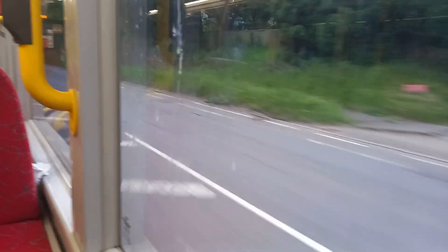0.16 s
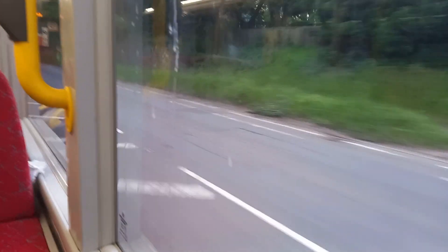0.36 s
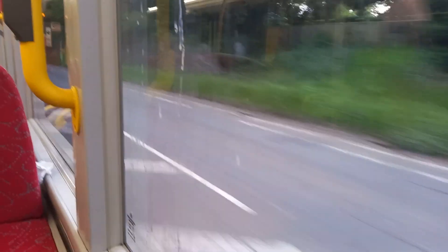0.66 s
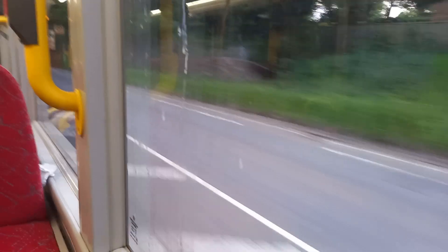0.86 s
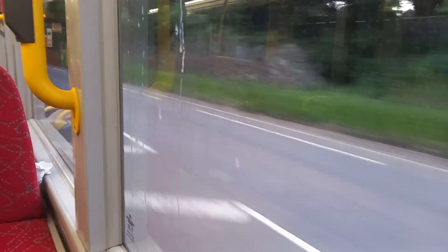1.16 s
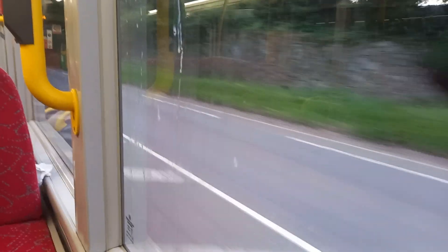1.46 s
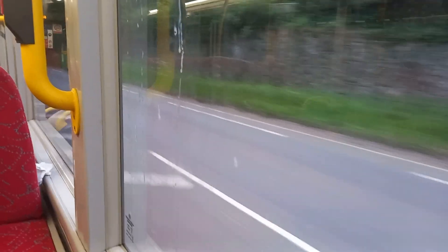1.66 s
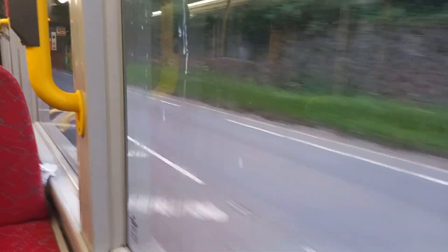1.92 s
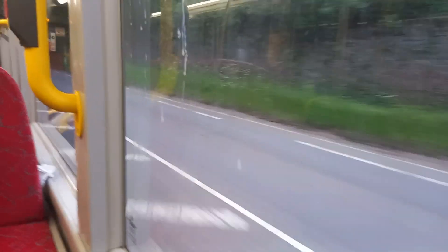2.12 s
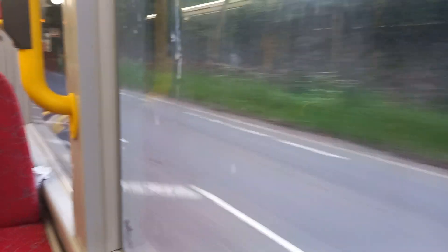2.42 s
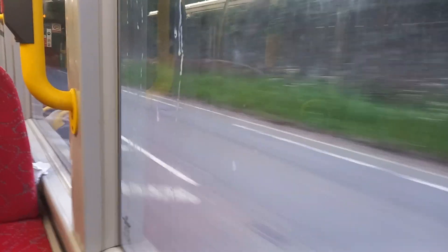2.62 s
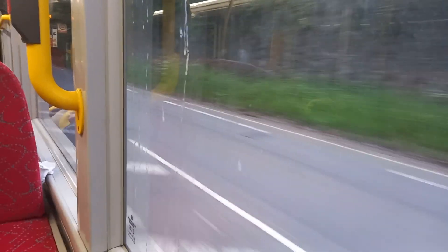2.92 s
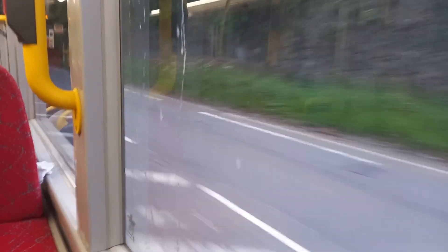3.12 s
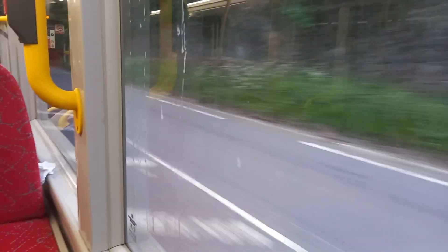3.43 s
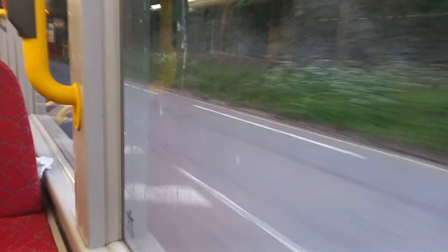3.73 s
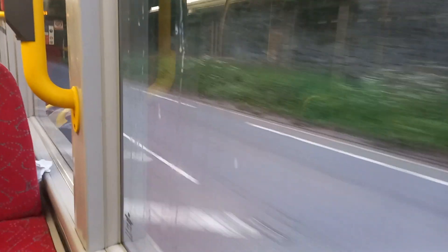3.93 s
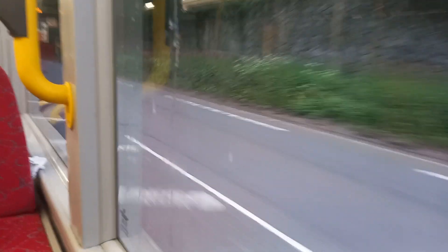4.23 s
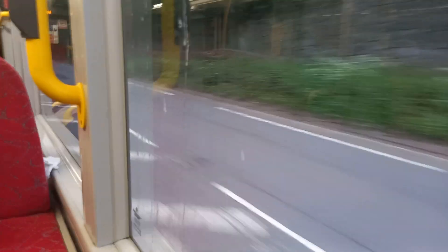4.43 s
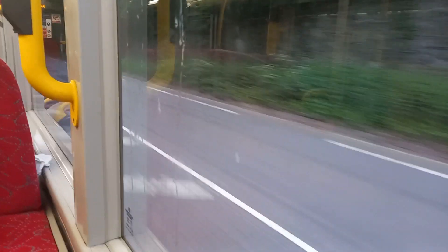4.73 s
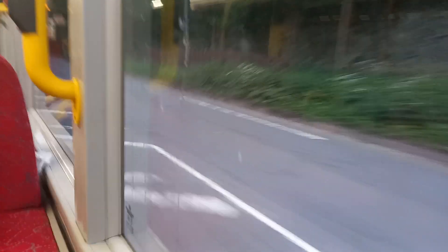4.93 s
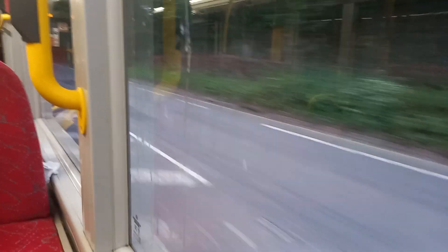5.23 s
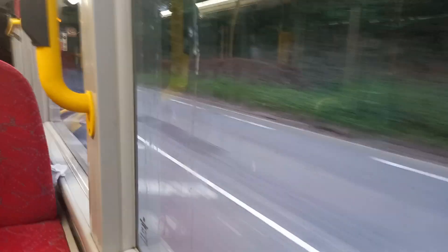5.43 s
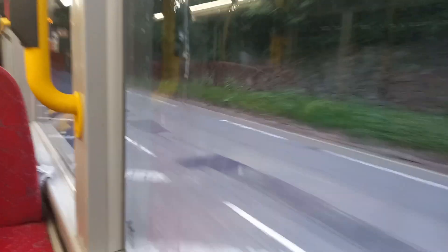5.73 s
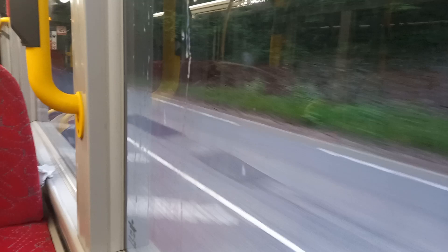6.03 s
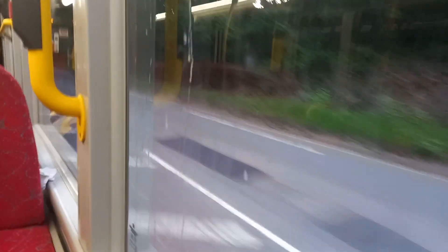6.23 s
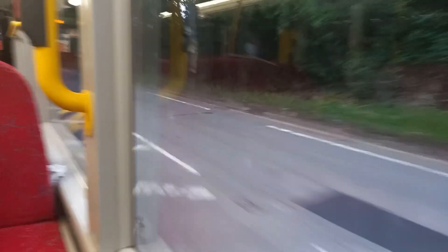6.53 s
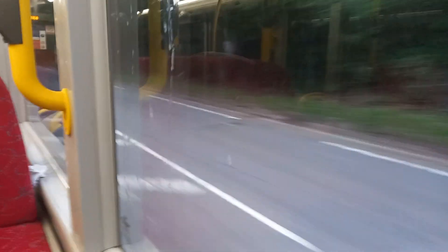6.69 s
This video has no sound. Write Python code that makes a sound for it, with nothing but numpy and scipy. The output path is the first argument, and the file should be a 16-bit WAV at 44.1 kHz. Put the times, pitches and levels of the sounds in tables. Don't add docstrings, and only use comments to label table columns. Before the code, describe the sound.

Bus cabin ride with booming diesel, road rumble, ticking and squeaking fittings; finally the engine drops away and rough tarmac rattles everything.

```python
import sys
import numpy as np
from scipy import signal
from scipy.fft import rfft, irfft
from scipy.io import wavfile
from scipy.ndimage import uniform_filter1d, minimum_filter1d, map_coordinates

SR = 44100
rng = np.random.default_rng(int(sys.argv[2]) if len(sys.argv) > 2 else 0)


def store_pcm(level_fs):
    pcm = np.round(np.clip(level_fs, -1, 1) * 32767).astype(np.int16)
    wavfile.write(sys.argv[1], SR, np.atleast_2d(pcm).T)


def ratio_of_db(decibels):
    return 10 ** (np.asarray(decibels, float) / 20)


N = 302526

# (time [s], level [dB])
ROAD = [(0, -20.5), (1.2, -22.5), (1.6, -25.5), (2, -23), (3.6, -25), (4.3, -21.5), (4.6, -23.5),
        (5.2, -23.5), (5.5, -21), (6.86, -20)]
# (frequency [Hz], level [dB per Hz])
RUMBLE = [(21, -64.5), (35, -36), (52, -18), (75, -5), (107, -5), (134, -4.5), (188, -12), (236, -8),
          (313, -14), (335, -10), (350, -30.5), (379, -22), (520, -38), (680, -48.5), (1140, -120)]
# (time [s], frequency [Hz], level [dB rms], rise and fall [s])
SWELLS = [(0.519, 95, -12.5, 0.094), (2.15, 80, -20.5, 0.12), (4.05, 78, -26.5, 0.15),
          (4.35, 76, -11.5, 0.028), (4.95, 92.1, -22.5, 0.1), (5.55, 97.3, -18, 0.046),
          (5.7, 81.2, -8.5, 0.039), (5.9, 80.3, -19, 0.21), (6.11, 82.4, -13.5, 0.089),
          (.15, 352, -28.5, 0.26), (1.45, 361.7, -31.5, 0.26), (6.15, 118.8, -17, 0.053),
          (6.4, 137.4, -18.5, 0.13), (6.73, 128, -16, 0.017), (6.8, 107, -23, 0.11),
          (.48, 417, -33.5, 0.036), (.78, 248.9, -20, 0.29), (2.5, 417, -37, 0.05),
          (4.2, 251.8, -26.5, 0.13), (4.7, 250, -25.5, 0.074), (5.2, 322, -24.5, 0.092),
          (5.37, 333, -23, 0.057), (6.35, 328.7, -28.5, 0.14), (6.7, 320, -29, 0.052)]

# (frequency [Hz], level [dB per Hz])
ROAR = [(250, -4.5), (430, -3), (471, -11.5), (539, -2.5), (1350, -10.5), (1800, -15), (2290, -18.5),
        (2630, -22.5), (6020, -36.5), (7210, -35), (8640, -47.5), (12400, -42.5), (15800, -48.5)]
# (frequency [Hz], level [dB per Hz])
GRIT = [(710, -21), (1200, -5.5), (1700, -12), (1940, -5), (2930, -8.5), (3270, -8.5), (3530, -9),
        (6700, -20.5), (9000, -32), (11700, -56), (19800, -120)]
# (frequency [Hz], level [dB per Hz])
BUZZ = [(2650, -38.5), (4500, 2), (5300, -1.5), (5880, -7), (7030, -1.5), (8860, -10.5), (14000, -12.5),
        (15800, -17)]
ROAR_DB, GRIT_DB, BUZZ_DB = -35.5, -53.5, -69.5
ROAR_PER_SHAKE, ROAR_PER_JOLT, GRIT_PER_JOLT = 0.21, 0.11, 0.2
GRIT_RISE_DB_PER_S, GRIT_TOP_S, GRIT_FALL_DB_PER_S = 1.05, 4.2, 6
ROAR_THROB_DB = 1.2
# (start [s], length [s], roar [dB], grit [dB], buzz [dB])
PATCHES = [(5.3, 0.53, 2, 2.5, 9), (5.77, 0.25, 4, 6.5, 10), (5.853, 0.22, 1.5, 7.5, 4.5),
           (5.942, 0.059, -4.5, 3, -1), (6.217, .06, 2, 5, .2), (6.387, 0.06, 1.5, 1, -1.5),
           (6.103, 0.068, 5, 6, 12.5), (6.183, 0.358, 4, 13, 17), (6.549, 0.1, 1.5, 5, -2),
           (6.553, 0.26, -1.3, 1, 7), (6.036, 0.079, -1.5, 4.5, 7)]
PATCH_EDGE_S = 0.034
# (time [s], buzz [dB], length [s])
JOLTS = [(0.114, 10, 0.13), (0.423, 8, 0.15), (0.568, 8, 0.047), (0.749, 6.5, 0.15), (0.886, 9, .08),
         (1.1, 4, 0.077), (1.197, 6, 0.057), (1.286, 9, .05), (1.702, 6.5, 0.19), (1.977, 6, .08),
         (2.115, 9, .03), (2.279, 5, 0.049), (2.391, 8, 0.037), (2.746, 8.5, 0.082), (3.047, 1.5, 0.045),
         (3.133, 11, 0.069), (3.534, 9, 0.19), (3.855, 6, 0.086), (3.909, 13, 0.089), (4.276, 11, 0.18),
         (4.463, 9, 0.071), (4.558, 13, 0.044), (4.717, 5.5, 0.29), (4.903, 10, 0.08), (5.12, 3, 0.057),
         (5.38, 4, 0.037), (5.59, 10, 0.027), (5.62, 8.5, .035), (5.77, -3, .05), (6.387, 5, 0.05)]
JOLT_RISE_S = 0.0046

# (frequency [Hz], width [Hz], level
# [dB])
FITTINGS = [(1030, 200, 4.5), (1803, 62, 4.5), (2290, 200, 3.5), (3100, 83, 1.5), (3610, 86, 3.5),
            (4680, 83, 3.5), (5400, 58, 5.5), (6830, 100, 0), (7300, 150, 1.5), (7770, 40, -2.5),
            (9300, 60, 4.5),
            (140, 14, 0.5), (417, 14, 1.5), (518.4, 5.6, 7), (551, 18, 4), (607, 14, 3), (647, 20, 3),
          (702, 22, 3.5), (750, 25, 1), (806, 25, 3), (893, 24, 4), (1010, 29, 4), (1103, 51, 3),
          (1220, 33, 3.5)]
# (frequency [Hz], likeness [0 to 1])
SAME = [(60, .96), (130, .96), (290, .975), (480, .3), (700, .3), (1050, .55), (1500, .35), (2200, .3),
        (4000, .2), (15000, .25)]
# (frequency [Hz], left over right [dB])
LEAN = [(60, 0.5), (110, -1.0), (200, -2.0), (380, -2.5), (700, -3.0), (1290, 1.2), (2380, 5.0),
        (4400, 0.0), (8120, -2.2), (15000, -1.5)]
# (frequency [Hz], phase [radians])
LEAD = [(430, .1), (690, 0), (1030, -3), (1980, -6.8), (3010, -9), (5860, -10.9), (15000, -11)]

# (time [s], peak [dB], pitch [Hz], top part [dB], left over right [dB])
TICKS = [(.3845, -45, 4800, -17, .1), (.4255, -38, 7300, -18, -0.5), (0.4948, -33, 5400, -25, -8),
         (.7492, -45.5, 7500, -10, -4.5), (1.697, -44.5, 5400, -15, -4), (2.394, -44, 6000, -14, -2),
         (0.5342, -37.5, 5400, -19, -1.5), (2.121, -39, 5450, -15.5, -3), (2.287, -40, 5190, -13, -5.5),
         (3.056, -38, 5400, -15, -1), (3.1523, -45, 5860, -19, -2.1), (3.5362, -36, 5160, -11, -2),
         (3.545, -37, 5230, -12, 1), (3.6436, -49, 12040, -12, -3), (3.579, -38, 6200, -19, 6),
         (3.926, -39, 7000, -21.5, -1), (3.9355, -46, 9500, -6, -1.5), (4.038, -36, 6020, 2.5, -9),
         (4.0394, -39.5, 3620, -12, -4.5), (4.297, -45, 5400, -13.5, 3), (4.557, -31, 6820, -18, -1),
         (4.755, -28, 6860, -13, 0), (4.86, -39.5, 5020, -11.5, -2), (5.3827, -35, 6860, -14, 4),
         (5.591, -44, 7100, -6.5, 0.5), (5.5967, -38, 7100, -9, -3), (5.672, -37, 9400, -21.5, -6),
         (5.6221, -36, 6170, -15.5, 2), (5.697, -36.5, 6540, -7, -0.5), (5.7618, -31, 6840, -22, -0.5),
         (6.032, -31.5, 5100, -19.5, 1), (6.148, -45, 7000, -11, -1.5), (6.6593, -43.5, 7050, -5.5, 0),
         (6.204, -37.5, 6870, -22, 2.5), (6.3878, -35, 5400, -14.5, 0.5), (6.455, -30.5, 6830, -19.5, -1.5),
         (6.6692, -35, 6540, -14.5, -1),
         (4.1734, -45, 7400, -5.5, -5), (4.211, -39.5, 6900, -22, -1), (4.632, -44.5, 7600, -19, -0.5),
         (4.82, -45.5, 7000, -14, -0.5), (4.935, -47, 6200, -8, -1), (2.9966, -47, 5400, -10.5, -1.5),
         (6.6418, -47.5, 7000, -9, -3.5), (2.1, -44.5, 6600, -19.5, -0.5), (3.6, -39, 4000, -12.5, -3.5)]
BODY_DB, BODY_DB_PER_OCTAVE = -2.5, -15.5
TAP_FIRST_S, TAP_EVERY_S, TAP_COUNT = 6.5585, .0277, 9
TAP_DB, TAP_HZ, TAP_TOP_DB = -52, 7200, -.5
# (time [s], peak [dB], pitch [Hz])
KNOCKS = [(.425, -21, 470), (.481, -29, 635), (.549, -26, 690), (.87, -26.5, 603), (1.263, -24, 696),
          (2.129, -22, 680), (.47, -32, 830), (3.54, -23, 680), (2.16, -39, 1050), (3.927, -29, 740),
          (4.032, -30, 570), (4.295, -23, 645), (5.234, -26, 703), (6.116, -29, 712), (6.268, -22, 680),
          (6.389, -27, 830), (6.819, -27.5, 692)]
# (multiple of the pitch, level [dB])
KNOCK_MODES = [(.5, 4.5), (1, .1), (1.37, -9), (2.2, -12)]
KNOCK_RISE_S, KNOCK_T60_S = .0015, .06
# (time [s], length [s], first pitch [Hz], last pitch [Hz], level [dB rms])
SQUEAKS = [(.26, 0.12, 5280, 5720, -59), (0.397, .07, 5000, 5050, -54), (0.502, .06, 5450, 5400, -53),
           (.52, 0.16, 5030, 5080, -59), (0.554, .12, 5400, 5250, -55), (0.583, .07, 4750, 4750, -62),
           (0.817, 0.16, 5300, 5200, -56), (2.118, 0.021, 5400, 5400, -52), (2.05, .07, 5450, 5500, -60),
           (2.502, .06, 5400, 5400, -68), (2.757, .12, 5450, 5500, -63), (3.15, 0.35, 9300, 9300, -75),
           (5.112, 0.04, 9150, 9100, -59), (5.112, .035, 10750, 10750, -66), (.5, 0.2, 10000, 10200, -66),
           (.87, .07, 10350, 10400, -66), (.8, .06, 10500, 10600, -71), (3.955, .06, 9600, 9600, -64),
           (4.33, .1, 9600, 9700, -69), (4.42, .08, 10000, 10000, -69), (4.85, .12, 9700, 9900, -66),
           (.92, 0.063, 4600, 4550, -63), (2.19, .13, 5500, 5450, -59), (4.22, .18, 7100, 7050, -67),
           (5.951, 0.055, 3300, 3270, -37), (5.94, .06, 1900, 1880, -46), (6.25, 0.21, 5400, 5400, -55),
           (6.55, 0.24, 5440, 5400, -68)]

# (time [s], frequency [Hz], level [dB rms])
TURBO = [(0, 13720, -64), (.36, 13990, -65), (.58, 14600, -65), (.8, 15250, -63), (1.1, 15420, -64),
         (1.35, 15720, -65), (1.7, 16400, -75), (5.2, 16400, -75), (5.4, 15700, -68), (5.6, 14500, -68),
         (5.75, 13500, -72), (5.9, 13000, -95)]
# (time [s], frequency [Hz], level [dB rms])
DRONE = [
    (5.7, 73, -75),
    (5.95, 69.5, -21),
    (6.15, 69.1, -21),
    (6.35, 69.5, -18),
    (6.5, 71, -16.5),
    (6.7, 72.5, -14.5),
    (6.86, 73, -15),
]

# (time [s], cycle rate, half the crank speed [Hz])
SPEED = [(0, 12.5), (.3, 12.9), (.55, 13.4), (.8, 14.1), (1, 14.15), (1.3, 14.72), (1.5, 15.25),
         (1.72, 15.78), (1.95, 15.62), (2.3, 15.78), (3, 15.74), (4, 15.85), (4.7, 15.9), (4.95, 15.85),
         (5.2, 15.3), (5.36, 14.9), (5.6, 13.4), (6.86, 12)]
# (time [s], load [dB], unevenness between cylinders [dB])
ENGINE = [(0, 5.5, -6.5), (.3, 4.5, 1), (.55, 0.5, -1.5), (1.2, 0.5, 0), (1.65, 2.5, 1), (1.95, .5, 1),
          (2.3, 2, -1), (3.2, 2.5, -0.2), (4.7, 3, -3), (5.02, 2.5, -1.5), (5.22, -1.5, 2),
          (5.45, -4.5, 1.5), (5.6, -17, 6), (5.8, -31, 7)]
# (multiple of the cycle rate, level [dB rms])
FIRING = [(4, -15.6), (5, -32.8), (6, -30.5), (7, -25.5), (8, -26.2), (9, -31), (10, -36.5), (11, -33),
          (12, -36.7), (13, -34), (15, -40.9), (16, -43.7), (14, -42), (17, -35), (18, -35), (19, -40.5),
          (20, -34), (21, -32.5), (22, -31.5), (23, -45), (24, -36.5), (25, -47), (26, -42.5), (27, -35.5),
          (28, -43.8)]
# (frequency [Hz], gain [dB])
CABIN = [(48.0, -8.0), (59.0, -4.9), (87.0, -6), (94.0, 4), (99.0, 5.8), (105.0, 0), (111.0, 2.5),
         (126.0, 10.1), (148.0, -1.8), (170.0, 11.7), (200.0, 1.2), (255.0, 6.8), (283.0, -2), (312.0, -8),
         (330.0, 2.0), (345.0, 1.5), (370.0, -1.1), (440.0, -15.2)]
# (frequency [Hz], level [dB rms])
BOOM = [(50, -25), (54, -22), (56.5, -17.5), (59, -16.5), (62, -17), (63.3, -23.5)]
CLATTER_DB, CLATTER_PER_LOAD, CLATTER_TOP_DB = 2, -2.24, 3.5
CUT_OFF_DB, CUT_OFF_SLOPE = -8, 4.7
SMEAR_TURNS = .022

MICROPHONE_HZ, EDGE_HZ = 45, 15830


def evened(x):
    return x / np.sqrt(np.mean(x ** 2) + 1e-20)


def read(points, hz):
    f, value = np.transpose(points)
    return np.interp(np.log(hz + 1), np.log(f + 1), value)


def curves(rows, t):
    s, *columns = np.transpose(rows)
    return [np.interp(t, s, c) for c in columns]


def drift(per_s):
    knots = rng.standard_normal(int(N / SR * per_s) + 3)
    return evened(map_coordinates(knots, [np.arange(N) / SR * per_s], order=3))


def plateau(t, start, length, edge):
    return np.clip(np.minimum(t - start, start + length - t) / edge + .5, 0, 1)


def add(mix, s, sound):
    part = mix[:, round(s * SR):][:, :sound.shape[1]]
    part += sound[:, :part.shape[1]]


def placed(x, hz):
    lean = read(LEAN, hz) / 2
    return x * ratio_of_db(np.array([lean, -lean]))


def fuzzy(hz, width_hz):
    a, b = rng.standard_normal((len(hz), 2)).T
    r = np.exp(-np.pi * width_hz / SR)
    slow = signal.lfilter([1], np.poly([r, r]), a + 1j * b)
    return evened((slow * np.exp(2j * np.pi * np.cumsum(hz) / SR)).real)


def noise(colour, band, size, patchy_db):
    hz = np.fft.rfftfreq(size, 1 / SR)
    a, b, c, d, patches = rng.standard_normal((4 * N // size + 8, len(hz), 5)).T
    patches = uniform_filter1d(patches, size=8, axis=0)
    patches = evened(uniform_filter1d(patches, size=4, axis=1))
    same = np.clip(read(SAME, hz), 0, 1)[:, None]
    late = np.exp(-1j * read(LEAD, hz))[:, None]
    left = a + 1j * b
    right = same * late * left + np.sqrt(1 - same ** 2) * (c + 1j * d)
    lean = read(LEAN, hz) / 2
    rings = sum(db / (1 + (2 * (hz - f) / width) ** 2) for f, width, db in FITTINGS)
    level_db = colour(hz) + rings + np.array([lean, -lean])
    z = np.array([left, right]) * ratio_of_db(level_db[:, :, None] + patchy_db * patches)
    inside = ((hz >= band[0]) & (hz <= band[1]))[:, None]

    def back(z):
        return signal.istft(z, nperseg=size, noverlap=3 * size // 4)[1][..., size:size + N]

    return back(z) / np.std(back(z.mean(0) * inside))


def road(t):
    rumble_db, = curves(ROAD, t)
    rumble = noise(lambda hz: read(RUMBLE, hz), (200, 320), size=4096, patchy_db=0.6)
    out = ratio_of_db(rumble_db + 1.5) * rumble
    for s, hz, db, rise in SWELLS:
        swell = np.exp(-.5 * ((t - s) / rise) ** 2)
        tone = np.sin(2 * np.pi * (hz * t + rng.random()))
        out += placed(np.sqrt(2) * ratio_of_db(db) * swell * tone, np.array([hz]))
    return out


def pings(count, per_s):
    out, u = np.zeros((2, N)), np.arange(3000) / SR
    for k, hz in enumerate(np.geomspace(900, 9500, count) * rng.uniform(0.9, 1.05, count)):
        blows = (rng.random(N) < per_s / SR) * ratio_of_db(4.5 * np.minimum(rng.exponential(1, N), 2))
        swell = ratio_of_db(read(ROAR, hz) - 60 * u / 0.037) * np.sqrt(hz) * np.minimum(u / 0.0015, 1)
        out[k % 2] += signal.oaconvolve(blows, swell * np.sin(2 * np.pi * hz * u))[:N]
    return evened(out + 0.12 * out[::-1])


def tyre_roar(t, patch_db, jolt_db):
    shake_db, = curves(ROAD, t)
    roar_db = ROAR_DB + ROAR_PER_SHAKE * (shake_db - shake_db.mean())
    roar_db += patch_db + ROAR_PER_JOLT * jolt_db + 0.42 * drift(20) + 0.19 * drift(11)
    roar_db = uniform_filter1d(roar_db, size=2000)
    cycle_hz, = curves(SPEED, t)
    throb = np.cos(2 * np.pi * np.cumsum(cycle_hz) / SR)
    roar_db += ROAR_THROB_DB * throb * (t < SPEED[-2][0])
    roar = noise(lambda hz: read(ROAR, hz), (600, 1800), size=4096, patchy_db=0.47)
    return ratio_of_db(roar_db) * (roar + ratio_of_db(-10.0) * pings(count=30, per_s=7.0))


def tarmac_grit(t, patch_db, jolt_db):
    grit_db = GRIT_DB + GRIT_RISE_DB_PER_S * np.minimum(t, GRIT_TOP_S)
    grit_db += patch_db + GRIT_PER_JOLT * jolt_db + 1.2 * drift(9)
    grit_db -= GRIT_FALL_DB_PER_S * np.maximum(t - 5.2, 0)
    return ratio_of_db(grit_db - 2.5) * noise(lambda hz: read(GRIT, hz), (2500, 5000), size=1024, patchy_db=1.0)


def trim_buzz(patch_db, jolt_db):
    hits = (rng.random(N) < 150 / SR) * ratio_of_db(2.2 * np.minimum(rng.exponential(1, N), 4))
    chatter = 2.2 + evened(signal.lfilter([1], [1, -np.exp(-1 / (0.0055 * SR))], hits))
    buzz = noise(lambda hz: read(BUZZ, hz), (8000, 13000), size=512, patchy_db=4.0)
    return ratio_of_db(BUZZ_DB + patch_db + jolt_db - 1.5) * buzz * evened(chatter)


def shaking(t):
    jolts = []
    for s, db, length in JOLTS:
        rise = np.clip((t - s) / JOLT_RISE_S + 1, 0, 1)
        jolts.append(db * rise * np.clip(2 - 2 * (t - s) / length, 0, 1))
    jolt_db = np.max(jolts, axis=0)
    roar_db, grit_db, buzz_db = sum(np.array(dbs)[:, None] * plateau(t, s, length, PATCH_EDGE_S)
                                    for s, length, *dbs in PATCHES)
    return tyre_roar(t, roar_db, jolt_db) + tarmac_grit(t, grit_db, jolt_db) + trim_buzz(buzz_db, jolt_db)


def ticks():
    out, u = np.zeros((2, N)), np.arange(2048) / SR
    hz = np.fft.rfftfreq(len(u), 1 / SR)

    def hump(centre_hz, spread):
        return np.exp(-.5 * (np.log((hz + 1) / centre_hz) / spread) ** 2)

    shape = np.minimum(u / 0.0014, 1) * (np.exp(-u / 0.0032) + .2 * np.exp(-u / 0.018))
    snap = np.minimum(u / .0004, 1) * (np.exp(-u / 0.001) + .04 * np.exp(-u / 0.008))
    taps = [(TAP_FIRST_S + k * TAP_EVERY_S, TAP_DB, TAP_HZ, TAP_TOP_DB, -3.0) for k in range(TAP_COUNT)]
    for s, db, tick_hz, top_db, pan_db in TICKS + taps:
        body_db = BODY_DB + BODY_DB_PER_OCTAVE * np.log2(tick_hz / 5200)
        ring = hump(tick_hz, 0.076) + 0.37 * hump(1.15 * tick_hz, .08)
        body = ratio_of_db(body_db + 0.5) * hump(3000, 0.64)
        z = rfft(rng.standard_normal((2, len(u))))
        burst = irfft(z * (ring + body), len(u)) * shape
        burst += irfft(z * ratio_of_db(top_db + 7.5) * hump(15500, 0.42), len(u)) * snap
        burst *= np.sqrt(len(hz) / np.sum(ring ** 2))
        add(out, s, ratio_of_db(db - 6.5) * burst * ratio_of_db(np.array([[pan_db], [-pan_db]]) / 2))
    return out


def knocks():
    out, u = np.zeros((2, N)), np.arange(6000) / SR
    shape = (1 - np.exp(-u / KNOCK_RISE_S)) * ratio_of_db(-60 * u / KNOCK_T60_S)
    for s, db, hz in KNOCKS:
        for times, mode_db in KNOCK_MODES:
            side = rng.random((2, 1))
            mode = np.sin(2 * np.pi * (times * hz * u + 0.1 * side))
            add(out, s, ratio_of_db(db + mode_db + 2.5) * shape * mode)
    return out


def squeaks():
    out = np.zeros((2, N))
    for s, length, first_hz, last_hz, db in SQUEAKS:
        pitch = np.linspace(first_hz, last_hz, round(length * SR))
        squeal = .8 * np.sin(2 * np.pi * np.cumsum(pitch) / SR)
        squeal += .8 * fuzzy(pitch, max(70, 115 * (first_hz / 7000) ** 2))
        squeal += .08 * fuzzy(2 * pitch, 260) * (2 * first_hz < SR / 3)
        squeal *= signal.windows.tukey(len(pitch), .6)
        add(out, s, squeal * ratio_of_db(db - 1) * np.array([[.7], [1.3]]))
    return out


def turbo(t):
    hz, db = curves(TURBO, t)
    return ratio_of_db(db + 1.5) * np.array([fuzzy(hz, 300), fuzzy(hz, 300)])


def drone(t):
    hz, db = curves(DRONE, t)
    turns = np.cumsum(hz * (1 + 0.02 * drift(7.4))) / SR
    return placed(np.sqrt(2) * ratio_of_db(db + 0.63 * drift(7.3)) * np.sin(2 * np.pi * turns), hz)


def engine(t):
    cycle_hz, = curves(SPEED, t)
    load_db, uneven_db = curves(ENGINE, t)
    firing_db = read(BOOM, 4 * cycle_hz) + CUT_OFF_SLOPE * np.minimum(load_db - CUT_OFF_DB, 0)
    clatter_db = np.minimum(CLATTER_DB + CLATTER_PER_LOAD * load_db, CLATTER_TOP_DB)
    turns, out = np.cumsum(cycle_hz) / SR, np.zeros((2, N))
    for order, db in FIRING:
        hz = order * cycle_hz
        if order == 4:
            level_db = firing_db
        else:
            level_db = db + load_db + read(CABIN, hz)
            level_db += clatter_db * (order > 14) + uneven_db * (order % 4 > 0)
        phase = order * turns + SMEAR_TURNS * (order - 8) ** 2
        phase += .15 * rng.random() + .015 * drift(6)
        tone = np.cos(2 * np.pi * phase)
        out += placed(np.sqrt(2) * ratio_of_db(level_db + .9 * drift(5)) * tone, hz)
    return out


def scene():
    t = np.arange(N) / SR
    cabin = road(t) + shaking(t) + ticks() + knocks() + squeaks()
    return cabin + turbo(t) + drone(t) + engine(t)


def top_cut(x):
    return signal.sosfilt(signal.butter(12, 15830, fs=SR, output="sos"), x)


def record(dry):
    bass_cut = signal.butter(6, MICROPHONE_HZ, "high", fs=SR, output="sos")
    padded = np.pad(dry, [(0, 0), (SR, SR)], "reflect", reflect_type="odd")
    cut = signal.sosfilt(bass_cut, padded)
    treble_cut = signal.firwin(511, EDGE_HZ, window=("kaiser", 9), fs=SR)
    cut = signal.oaconvolve(cut, treble_cut[None], "same")[:, SR:-SR]
    room_left = np.minimum(.985 / (abs(cut).max(0) + 1e-9), 1)
    gain = uniform_filter1d(minimum_filter1d(room_left, size=600), size=500)
    return top_cut(cut * gain)


dry = scene()
out = record(dry)
store_pcm(out)
```